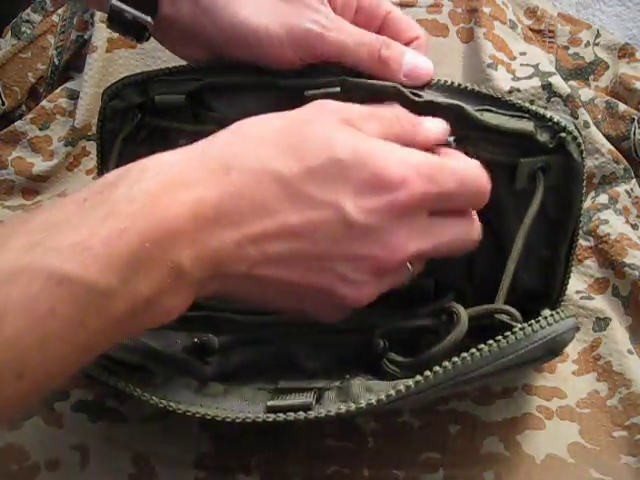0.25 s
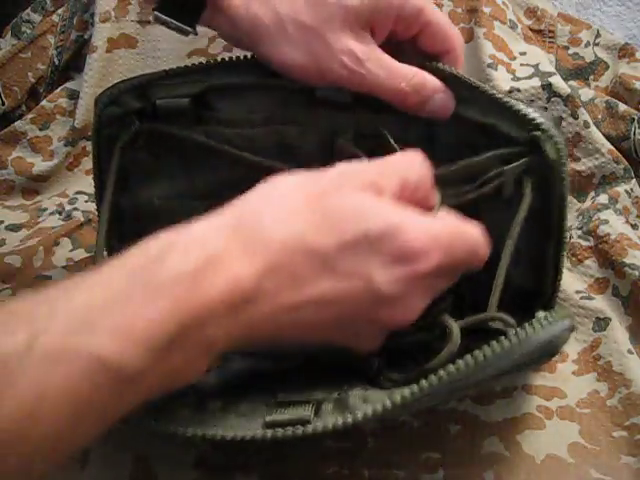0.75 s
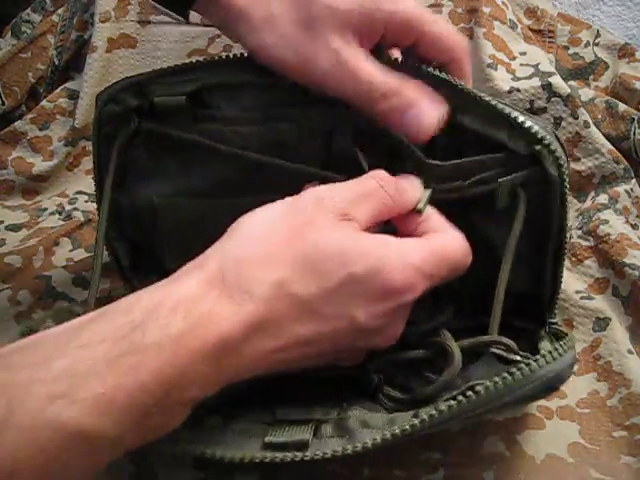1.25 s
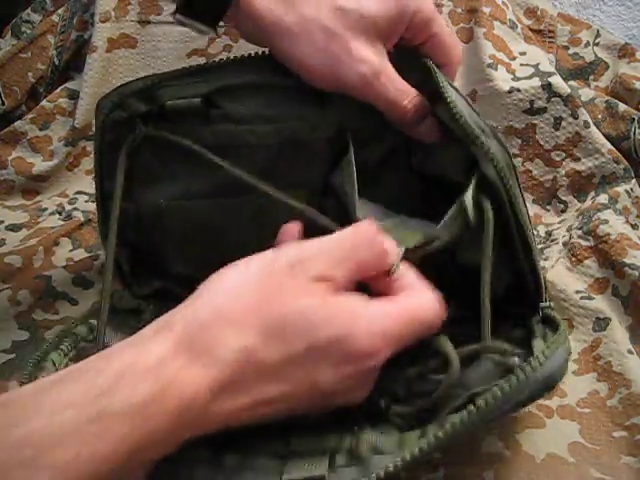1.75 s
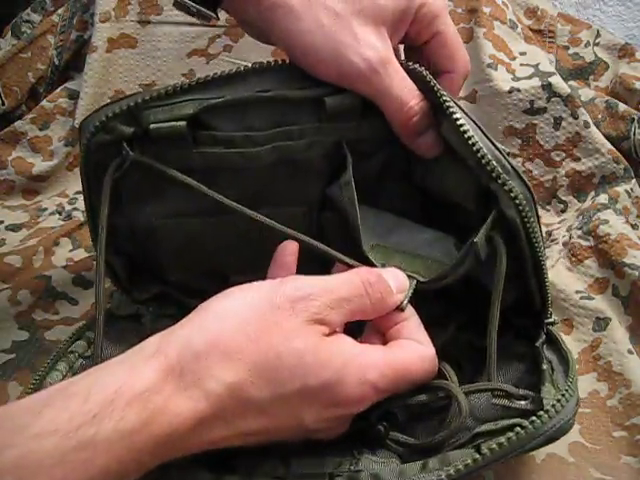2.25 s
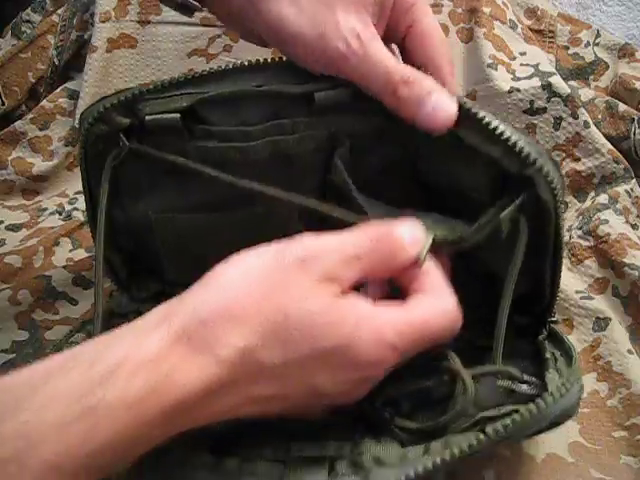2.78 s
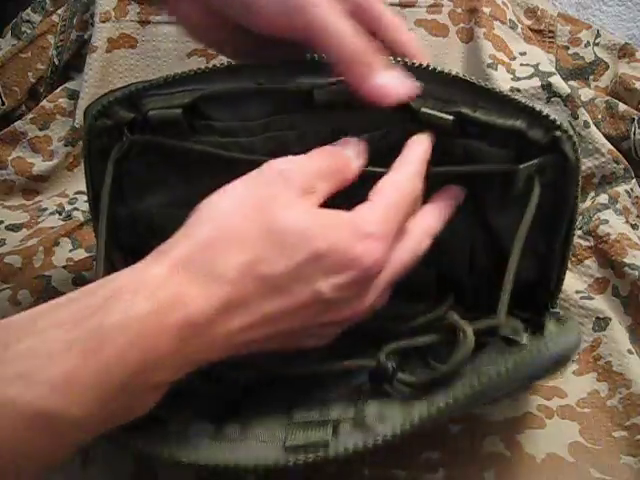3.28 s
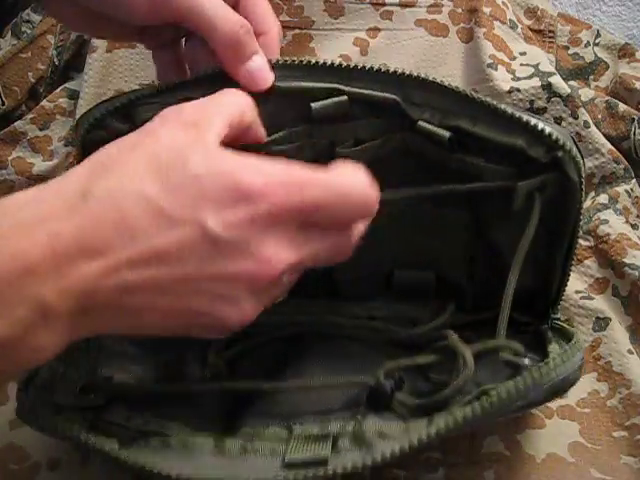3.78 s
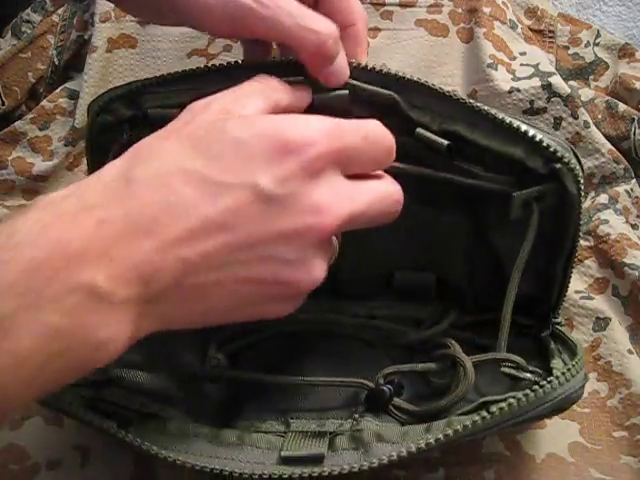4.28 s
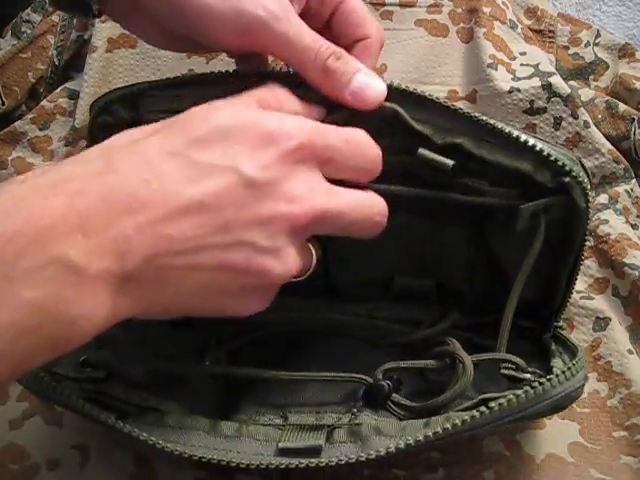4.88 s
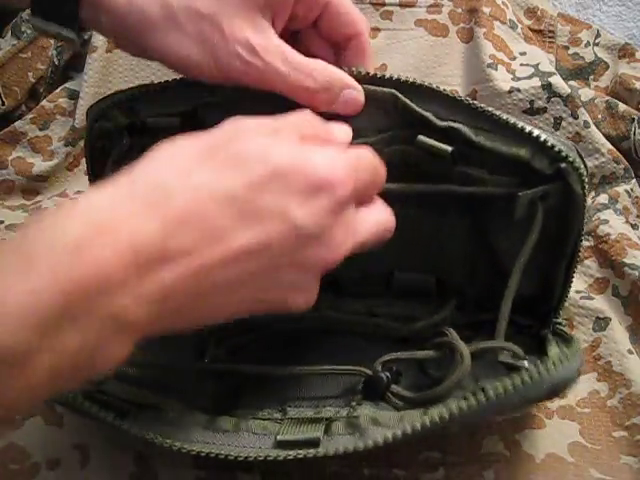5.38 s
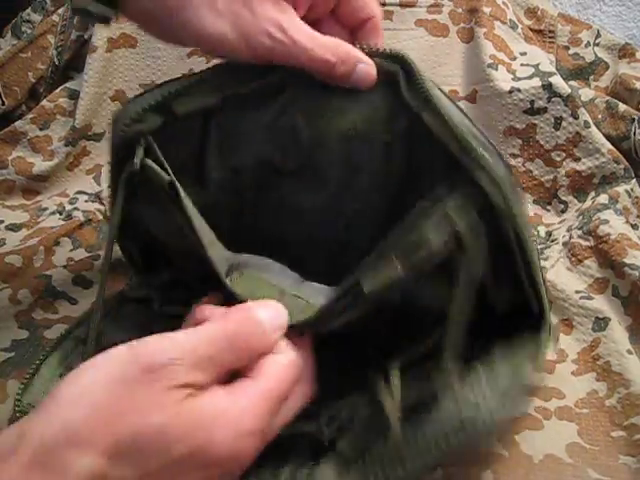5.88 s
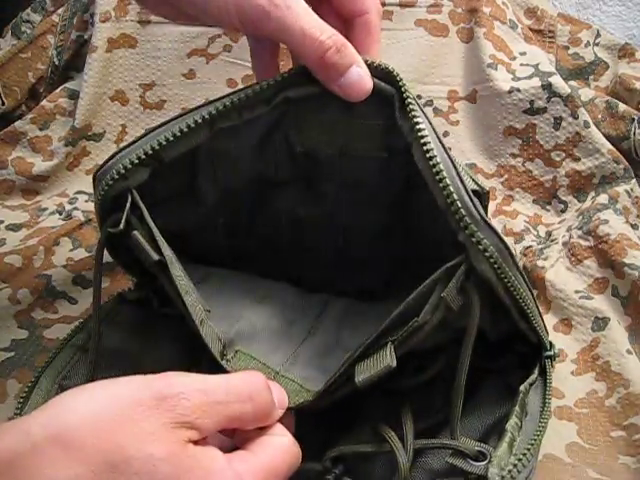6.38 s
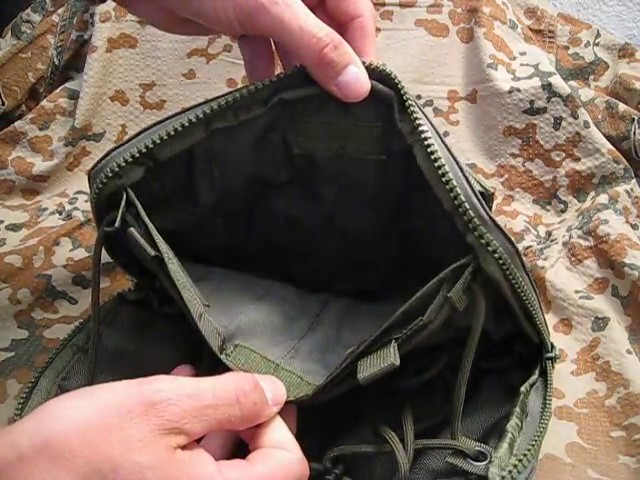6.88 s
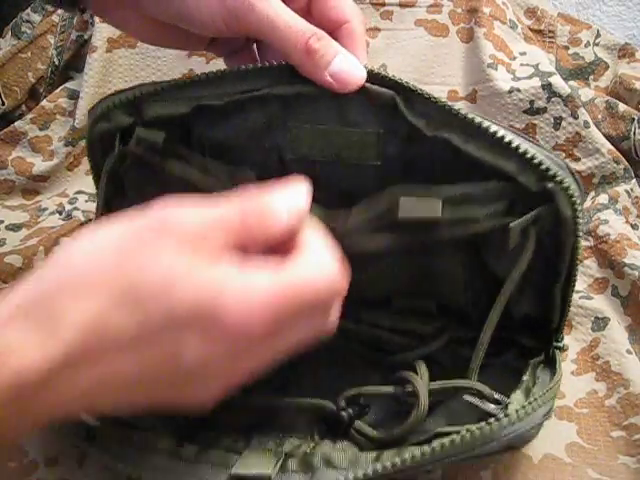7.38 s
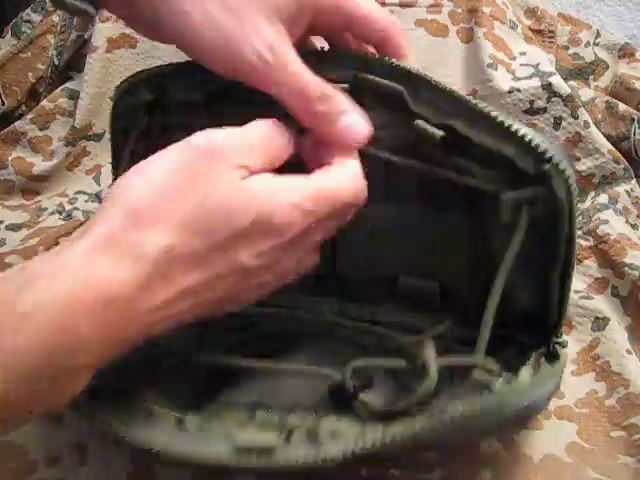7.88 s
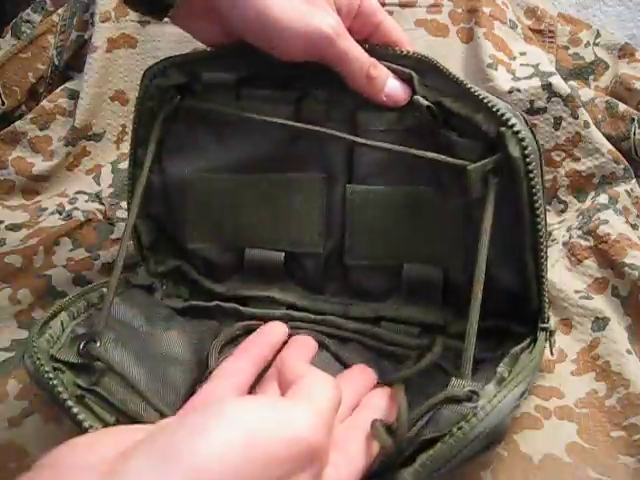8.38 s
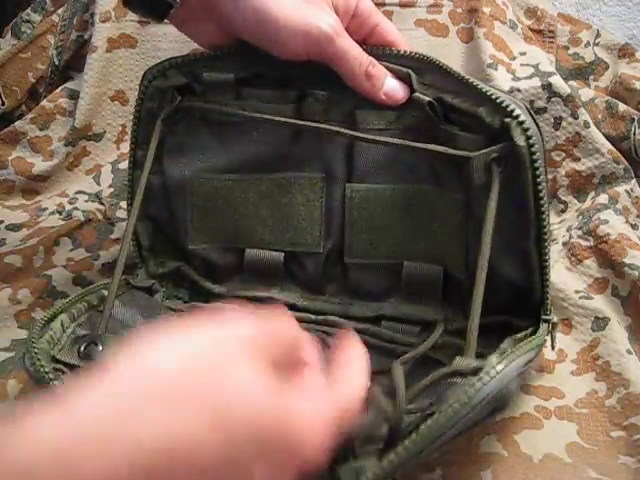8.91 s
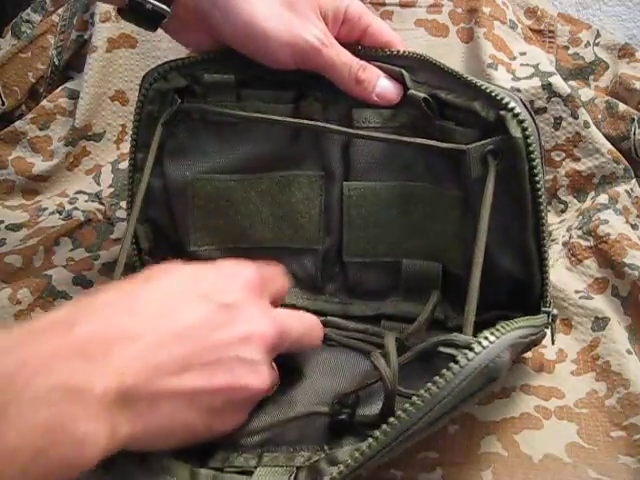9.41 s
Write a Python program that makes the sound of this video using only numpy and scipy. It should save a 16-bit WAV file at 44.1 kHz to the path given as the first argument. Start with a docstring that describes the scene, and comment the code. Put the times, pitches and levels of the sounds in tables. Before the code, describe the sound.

Two short, sharp hook-and-loop rips break up soft fabric rubbing, tiny ticks and light pats as fingers work inside a nylon pouch indoors.

```python
"""A small, quiet furnished room: hands work in a nylon pouch held close to a small camera's microphone.
Twice they pull the hook-and-loop strip of an inner pocket apart: hooks snap and drum on the taut cloth.
Around this, fingers and cloth rub, small ticks sound and the flap is patted shut.
Rubbing is slipping-thread noise, pats are scuffs, and snaps and ticks are short filtered bursts.
Pats, snaps and ticks wake the room's echoes; hiss and a low hum lie beneath."""
import sys
import numpy as np
from scipy import signal
from scipy.fft import rfft, irfft
from scipy.io import wavfile
from scipy.ndimage import uniform_filter1d

SR = 44100
rng = np.random.default_rng(int(sys.argv[2]) if len(sys.argv) > 2 else 0)


def materialize(psi):
    """Save the field psi as 16-bit PCM at rate SR to the path in sys.argv[1].

    A 1-D psi becomes a single channel; in a 2-D psi each row is a channel.
    """
    bounded = np.clip(np.atleast_2d(psi).T, -1, 1)
    quanta = np.round(bounded * 32767).astype(np.int16)
    wavfile.write(sys.argv[1], SR, quanta)


N = 425548
TIME = np.arange(N) / SR
HZ = np.fft.rfftfreq(N, 1 / SR)

# All table levels stand ahead of the recorder's gain control.
# Room noise spectrum: (frequency [Hz], relative level [dB])
ROOM_HISS = [(20, 2), (110, -2), (170, 1.5), (400, -2), (540, 0), (950, -5), (1500, -5), (3000, -14),
             (7000, -22), (12000, -56), (16000, -15.5)]
# Decay of the room's echoes: (frequency [Hz], time to fall 60 dB [s])
ROOM_T60 = [(200, 0.22), (2000, 0.33), (6000, 0.12)]
# Spectrum of rubbed cloth, shape within each band: (frequency [Hz], relative level [dB])
CLOTH_COLOUR = [(130, -30), (290, -4.5), (480, -6.5), (620, 1), (880, -8.5), (1400, 2.5), (3300, 5),
                (5800, 3), (7300, -1.5), (9500, 1.5), (12300, 5.5), (13600, -5), (16000, -16.5)]
# Held pouch shifting all the while, ahead of the band trims in rubbing(): (time [s], level [dB])
SHIFT = [(0, -54.5), (.5, -49), (1.2, -38.5), (1.33, -51.5), (1.5, -45.5), (1.95, -65), (2.5, -56.5),
         (4.3, -49), (5.05, -53.5), (5.3, -48.5), (6.15, -46), (6.42, -63.5), (7.0, -60.5), (7.45, -52.5),
         (8.85, -59.5), (9.38, -45), (9.65, -62.5)]
SHIFT_HOLLOW_DB, SHIFT_FIZZ_DB = -7.5, -5  # against the shift level, ahead of the trims
# Fingers sliding over the cloth, ahead of the trims; hollow and fizz are against the level:
# (start [s], length [s], level [dB], hollow of the pouch [dB], fizz of the weave [dB])
SLIDES = [(0.1, 0.039, -45, -9, -5), (0.557, 0.15, -51, -12, -1), (1.11, 0.11, -39, -22, -5),
          (2.619, 0.17, -44.5, -12.5, -5), (2.924, 0.029, -44, -11.5, -5), (3.01, 0.24, -48.5, -25, -2),
          (3.6, 0.28, -45, -10, -1.5), (3.902, 0.029, -38, -6, -3.5), (4.026, 0.046, -46, -7, -2.5),
          (4.141, 0.074, -46, -3, -5), (4.335, 0.02, -40.5, -4.5, -5), (4.42, 0.043, -40, -7, -1),
          (4.734, 0.022, -37, -10.5, -5.5), (5.118, 0.0073, -32.5, -11, -0.5), (6.064, 0.018, -38, -8, -3),
          (6.554, 0.13, -58, -6, 4), (7.144, 0.22, -54, -5, -0.5), (7.512, 0.5, -52, -11, -2),
          (8.939, 0.062, -49, 0, -1), (9.009, 0.2, -44, -11, -0.5), (9.417, 0.12, -43.5, -9.5, 1)]
SLIDE_ATTACK_S, SLIDE_RELEASE_S = 0.0065, 0.013
# Cloth let go or pushed over, rustling as it settles, ahead of the trims; hollow and fizz as above:
# (time [s], level [dB], decay time [s], hollow [dB], fizz [dB])
SETTLES = [(0.772, -32, 0.17, -6.5, -0.5), (0.909, -35, .11, 3, 0), (1.6, -32, 0.16, -6.5, -5.5),
           (5.335, -21.5, 0.052, -9.5, -13), (5.418, -23.5, 0.072, -18, -5.5), (5.6, -35.5, 0.25, -29, -3),
           (5.851, -27.5, 0.079, -4.5, -4), (8.045, -39.5, 0.2, -9, -3), (9.178, -29, 0.055, -3, -1.5)]
SETTLE_RISE_S = 0.003
# Fingers and flap brushing the pouch: (time [s], level before the stroke's envelope [dB],
# centre frequency [Hz], decay time [s])
PATS = [(.654, -29, 3020, 0.011), (3.153, -38.5, 363, 0.0047), (3.523, -39.5, 515, 0.01),
        (3.719, -37, 1750, 0.068), (3.754, -32.5, 506, 0.0091), (3.81, -31, 1700, 0.0056),
        (5.853, -25.5, 1710, 0.059), (5.95, -32.5, 710, 0.013), (7.181, -36.5, 620, 0.005),
        (7.409, -40, 1590, 0.017), (7.559, -35.5, 1640, 0.014), (8.08, -39, 816, 0.049),
        (8.215, -41.5, 670, 0.051), (8.957, -28, 1530, 0.014), (9.179, -28.5, 1740, 0.044),
        (9.256, -32.5, 684, 0.021)]
# Distinct hook snaps, large and small, each at its own time, ahead of the panel and the gain in hooks():
# (time [s], level over 3 ms [dB], pitch [Hz], thump against level [dB], fizz against level [dB])
SNAPS = [(0.6888, -33.5, 2550, -4, -7), (0.7691, -8.5, 4900, -14, 0.5), (0.7802, -18, 5100, -4, 5),
         (0.7857, -19, 5000, -10, -3), (0.7898, -19, 4200, -11.5, 2), (0.8147, -21, 2700, -5.5, -1),
         (0.8321, -19.5, 5300, -20, 2), (0.8358, -25, 4400, -28, 0), (0.8995, -30.0, 2780, -15, 3),
         (0.9076, -18, 5130, -14, 3), (0.9106, -13, 5200, -15.5, -5), (0.9261, -19.5, 5000, -9, 3),
         (0.9323, -16, 4800, -26, 0.5), (0.9447, -17, 5000, -20, -5), (0.9527, -28, 3100, -32, 1),
         (0.9579, -22, 5000, -17, -6), (0.9713, -21, 5300, -31, -3), (0.9759, -19, 4900, -18, -3),
         (0.978, -28, 4600, -13, 1), (0.9831, -21, 4630, -23, -1), (1.002, -23.5, 5030, -24, -1),
         (1.0058, -27, 4700, -15, 4), (1.0321, -20, 4400, -19, -2.5), (1.0394, -22, 3500, -9, -4),
         (1.047, -18.5, 4560, -17, -2), (1.5206, -13.5, 5560, -22, 2), (1.5329, -12, 4630, -20, 1.5),
         (1.5906, -20.5, 3520, -14, 3), (1.5921, -17.5, 4100, -19, -2), (1.596, -17.5, 4750, -17, -2),
         (5.3344, -13.5, 2460, -6, -2), (5.4154, -6.5, 3350, -13, -6), (5.4274, -11, 2900, -10.5, -15),
         (5.445, -18.5, 3830, -24, 0), (5.4623, -18.5, 3533, -10, 2), (5.4706, -16.5, 3193, -29, -4),
         (5.4736, -24, 2990, -25, 10.5), (5.4786, -33, 2900, -27, 9), (5.4891, -29.5, 3700, -14, 9),
         (5.5254, -32, 4200, -15, 9), (5.5917, -22, 2510, -24, 7.5), (5.598, -13.5, 5100, -19, -1),
         (5.6434, -17.5, 5470, -24, -7), (5.7128, -25.0, 5030, -26, 0)]
# Stretches where the strip runs and bunches of hooks crowd, ahead of the panel and the gain in hooks():
# (start [s], end [s], typical bunch level [dB], its fizz against level [dB])
TEARS = [(1.599, 1.615, -24, 3), (1.617, 1.63, -41, 7), (1.631, 1.655, -33.5, 5.5),
         (5.464, 5.479, -22.5, -5), (5.519, 5.54, -30.5, 3.5), (5.596, 5.609, -30, 9),
         (5.612, 5.636, -38.5, 6), (5.644, 5.671, -30, 4.5), (5.703, 5.73, -32, 4.5),
         (5.733, 5.756, -29.5, 4)]
# Notes of the stretched pocket: (frequency at release [Hz], time to fall 60 dB [s],
# lift while slack [dB], lift while taut [dB])
PANEL_MODES = [(650, 0.076, 6.5, -12), (1175, 0.012, 9.5, 12.5), (2050, 0.013, 2, 0.5)]
PANEL_SAG, PANEL_SAG_S = 0.15, 0.028  # share of pitch lost as the panel slackens, and its time constant
# The pocket is pulled taut: (start [s], end [s])
TAUT = [(1.5, 1.7), (5.5, 5.8)]
# Single small ticks of creases, and of lone hooks letting go during the pulls, ahead of the gain in ticks():
# (time [s], level over 3 ms [dB], pitch [Hz], fizz against level [dB])
TICKS = [(0.7058, -28, 4700, -0.5), (0.8769, -28.5, 5200, 2), (1.2005, -33.0, 3800, 3),
         (1.45, -31.0, 5600, -8), (1.4938, -40, 5500, -1), (1.7006, -26, 3170, -14), (2.1821, -43, 4900, 2),
         (3.3159, -43, 3500, -9), (3.6646, -38, 3460, -5), (4.0495, -40, 4000, 6), (5.372, -29, 4100, 1),
         (5.5824, -33, 2900, 3), (5.6934, -33, 2800, 0), (6.1858, -30.0, 5640, 0.5),
         (7.1807, -35.5, 4080, -5.5), (7.3479, -33, 5070, -5), (7.9846, -38, 3570, 5),
         (9.1787, -32, 2370, -12)]
# Strained or pinched cloth crackling finely: (start [s], end [s], typical tick level [dB])
STRAINS = [(1.451, 1.5, -32.5), (2.068, 2.38, -47.5), (2.559, 2.72, -41.5), (5.291, 5.41, -36.5)]
EDGE_HZ = 15950  # upper limit of the recorded band


def amp(db):
    """Amplitude ratio for a level in dB."""
    return 10 ** (np.asarray(db) / 20)


def unit(x):
    """Scale to an RMS of one."""
    return x / np.sqrt(np.mean(x ** 2) + 1e-20)


def read(points, hz):
    """Read a table between its points on a log frequency axis."""
    f, value = np.transpose(points)
    return np.interp(np.log(hz + 1), np.log(f + 1), value)


def add(mix, s, sound):
    """Lay a sound into the mix at a time in seconds."""
    part = mix[max(round(s * SR), 0):][:len(sound)]
    part += sound[:len(part)]


def below(hz, edge_hz, order=8):
    """Gain of a smooth low-pass."""
    return 1 / np.sqrt(1 + (hz / edge_hz) ** (2 * order))


def wander(rate_hz):
    """Slow random drift: noise low-passed at the rate, with an RMS of one."""
    return unit(irfft(rfft(rng.standard_normal(N)) * below(HZ, rate_hz, order=2), N))


def background(hiss_db=-54.5, hum_db=-63.0, hum_hz=49.5):
    """Steady coloured room noise, and a low hum that wavers in phase and level."""
    hiss = unit(irfft(rfft(rng.standard_normal(N)) * amp(read(ROOM_HISS, HZ)), N))
    phase = 2 * np.pi * hum_hz * TIME + .4 * wander(rate_hz=5)
    hum = np.sin(phase) * amp(1.5 * wander(rate_hz=5))
    return amp(hiss_db) * hiss + amp(hum_db) * unit(hum)


def motion():
    """Loudness of hollow, rasp and fizz: slides swell and stop, loose cloth dies away, the pouch shifts."""
    t = TIME[::40]  # hand motion needs only a coarse clock
    moves = [(amp(np.interp(t, *np.transpose(SHIFT))), SHIFT_HOLLOW_DB, SHIFT_FIZZ_DB)]
    for s, length, db, hollow_db, fizz_db in SLIDES:
        swell = np.maximum(s - t, 0) / SLIDE_ATTACK_S
        stop = np.maximum(t - s - length, 0) / SLIDE_RELEASE_S
        moves.append((amp(db) * np.exp(-swell - stop), hollow_db, fizz_db))
    for s, db, decay_s, hollow_db, fizz_db in SETTLES:
        fade = np.exp(-np.maximum((s - t) / SETTLE_RISE_S, (t - s) / decay_s))
        moves.append((amp(db) * fade, hollow_db, fizz_db))
    # separate movements add as power
    power = sum(np.outer(amp([hollow_db, 0, fizz_db]), level) ** 2 for level, hollow_db, fizz_db in moves)
    return [np.interp(TIME, t, np.sqrt(band)) for band in power]


def slips(per_s, spread_db):
    """Threads catching and slipping: a dense train of clicks, a few of them large."""
    sizes = amp(spread_db * np.minimum(rng.exponential(1, N), 5))
    signs = rng.choice([-1, 1], N)
    happens = rng.random(N) < per_s / SR
    return unit(sizes * signs * happens)


def folds(x, patch=5, depth_db=2.5):
    """Shifting folds favour changing patches of the spectrum, equally deep at every pitch."""
    _, _, z = signal.stft(x, nperseg=512)
    patches = uniform_filter1d(rng.standard_normal(z.shape), patch, 0)
    patches = unit(uniform_filter1d(patches, patch, 1))
    return signal.istft(z * amp(depth_db * patches), nperseg=512)[1][:N]


def rubbing(body_db=-1.5, rasp_db=0.0, weave_db=2.2, crinkle=0.54, uneven_db=1.0):
    """Slips of the weave, clumped by the uneven stroke, sound in the hollow, the cloth and its surface."""
    stroke = amp(1.1 * wander(rate_hz=60))
    fine = slips(per_s=14000, spread_db=1.8)
    coarse = slips(per_s=320, spread_db=2.3)
    drive = (fine + crinkle * coarse) * stroke * amp(uneven_db * wander(rate_hz=17.7))
    spectrum = rfft(folds(drive)) * amp(read(CLOTH_COLOUR, HZ))
    low, mid = below(HZ, 1100), below(HZ, 7900)
    bands = (low, mid - low, 1 - mid)  # hollow, rasp, fizz
    body, rasp, fizz = (unit(irfft(spectrum * band, N)) * level for band, level in zip(bands, motion()))
    return amp(body_db) * body + amp(rasp_db) * rasp + amp(weave_db) * fizz


def pats(size=8192):
    """A soft contact: a short scuff in one broad resonance of the cloth."""
    t = np.arange(size) / SR
    hz = np.fft.rfftfreq(size, 1 / SR) + 1
    out = np.zeros(N)
    for s, db, centre_hz, decay_s in PATS:
        grit = rng.standard_normal(size)
        peak = 1 / np.hypot(1, 2 * (hz / centre_hz - centre_hz / hz))
        resonance = below(centre_hz / 2, hz, order=2) * peak  # also cuts well below the centre
        stroke = (1 - np.exp(-t / .001)) * np.exp(-t / decay_s)
        add(out, s, amp(db) * unit(irfft(rfft(grit) * resonance)) * stroke)
    return out


def room(x, wet_db, size=22050):
    """A small furnished room: scattered echoes that die sooner in the treble."""
    echoes = rng.random(size) < 3000 / SR  # 3000 a second on average
    after_gap = np.arange(size) > .004 * SR  # none within 4 ms
    taps = rng.standard_normal(size) * echoes * after_gap
    hz, t, z = signal.stft(taps, SR, nperseg=256)
    decay = np.exp(-np.log(1000) * t / read(ROOM_T60, hz)[:, None])
    tail = signal.istft(z * decay, SR, nperseg=256)[1]
    return x + amp(wet_db) * signal.fftconvolve(x, tail / np.linalg.norm(tail))[:N]


def snap(db, pitch_hz, thump_db, fizz_db, size=1024, thump_hz=1000, width=1.68, fizz_hz=11000,
         straggle_db=-4, quiver_db=-11):
    """A sharp release, stragglers (more in a loud snap) and a quiver, heard as thump, pitch and fizz."""
    t = np.arange(size) / SR
    stragglers = rng.standard_normal(size) * np.exp(-t / .0012)
    quiver = rng.standard_normal(size) * np.exp(-t / .005)
    # the hook chatters for about a millisecond as it slips free
    chatter, gap = np.zeros(size), rng.integers(9, 20)
    chatter[:4 * gap:gap] = -.55, .7, .38, .21
    bunch = amp(np.minimum(db, -12) + 20)  # grows with level, up to -12 dB
    drive = chatter + amp(straggle_db) * bunch * stragglers / np.linalg.norm(stragglers)
    drive += amp(quiver_db) * quiver / np.linalg.norm(quiver)
    # (filter order, low edge [Hz], high edge [Hz], level against the snap [dB])
    bands = [(1, 190, thump_hz, thump_db),
             (2, pitch_hz / width, pitch_hz * width, 0),
             (2, fizz_hz / 1.15, fizz_hz * 1.15, fizz_db)]
    out = np.zeros(size)
    for order, low_hz, high_hz, part_db in bands:
        part = signal.lfilter(*signal.butter(order, (low_hz, high_hz), "bandpass", fs=SR), drive)
        out += amp(db + part_db) * part / part[:round(.003 * SR)].std()  # level over the first 3 ms
    return out


def panel(x, size=8192):
    """The stretched pocket rings after each release, its notes sinking; taut, its lowest note weakens."""
    t = np.arange(size) / SR
    turns = np.cumsum(1 - PANEL_SAG * (1 - np.exp(-t / PANEL_SAG_S))) / SR
    taut = sum((TIME > start) & (TIME < end) for start, end in TAUT)
    out = x
    for hz, t60, slack_db, taut_db in PANEL_MODES:
        fade = np.exp(-np.log(1000) * t / t60)
        ring = 2 * np.cos(2 * np.pi * hz * turns) * fade / fade.sum()
        lift = np.where(taut, amp(taut_db), amp(slack_db))
        out = out + signal.oaconvolve(x * lift, ring)[:N]
    return out


def hooks(gain_db=7.0, crowd_pitch_hz=4000, crowd_thump_db=-24):
    """Distinct snaps, large and small, each at its own time; where the strip runs, others crowd in."""
    out = np.zeros(N)
    for s, *settings in SNAPS:
        add(out, s, snap(*settings))
    per_s, scatter_db, scatter_octaves = 380, 3, .6
    for start, end, db, fizz_db in TEARS:
        for s in np.arange(start, end, 1 / per_s):
            late = rng.uniform(-.4, .8)  # share of the mean gap
            loud_db, bright_db = rng.normal(0, scatter_db, 2)
            pitch_hz = crowd_pitch_hz * 2 ** rng.uniform(-scatter_octaves, scatter_octaves)
            bunch = snap(db + loud_db, pitch_hz, crowd_thump_db, fizz_db + bright_db - loud_db / 2)
            add(out, s + late / per_s, bunch)
    return amp(gain_db) * panel(out)


def ticks(per_s=40, scatter_db=4.0, thread_hz=4800, thump_db=-14, gain_db=2.5):
    """Creases and lone hooks tick as small snaps without the panel's ring; strained threads tick at random."""
    events = list(TICKS)
    for start, end, db in STRAINS:
        for s in np.arange(start, end, 1 / per_s):
            late_s = rng.random() / per_s
            level_db = db - gain_db + scatter_db * rng.standard_normal()  # the gain is given back below
            pitch_hz = thread_hz * 2 ** rng.uniform(-0.56, 0.78)
            events.append((s + late_s, level_db, pitch_hz, -2))
    out = np.zeros(N)
    for s, db, pitch_hz, fizz_db in events:
        add(out, s, snap(db, pitch_hz, thump_db, fizz_db))
    return amp(gain_db) * out


def scene():
    """Background and rubbing stay close and dry; pats, ticks and snaps wake the room."""
    close = background() + rubbing()
    return (close + room(pats() + ticks() + hooks(), wet_db=-16.0))[None]


def record(dry, notch_hz=7880, notch_width_hz=1300, ceiling=0.53, threshold_db=-30, squeeze=0.34,
           recovery_db_per_s=55):
    """Gain control ducks loud moments, peaks round off, the microphone has a deep notch and a band limit."""
    power_db = 10 * np.log10(abs(uniform_filter1d(dry[0] ** 2, size=260)) + 1e-12)
    # hold each peak of the level and let it fall at a steady rate
    fall_db = recovery_db_per_s * TIME
    held_db = np.maximum.accumulate(power_db + fall_db) - fall_db
    over_db = np.maximum(held_db - threshold_db, 0)
    ducked = dry / amp(squeeze * uniform_filter1d(over_db, size=100))
    rounded = ceiling * np.tanh(ducked / ceiling)
    b, a = signal.iirnotch(notch_hz, notch_hz / notch_width_hz, SR)
    heard = signal.lfilter(b, a, rounded)
    band_limit = signal.firwin(255, EDGE_HZ, window=("kaiser", 9), fs=SR)
    return signal.oaconvolve(heard, band_limit[None], "same")


dry = scene()
out = record(dry)
materialize(out)
```